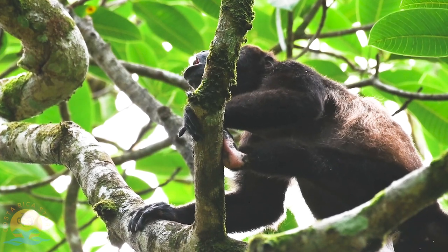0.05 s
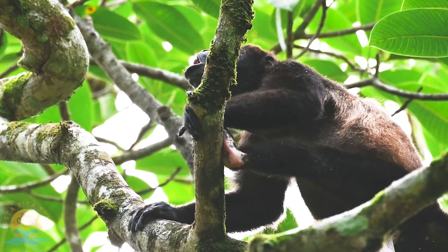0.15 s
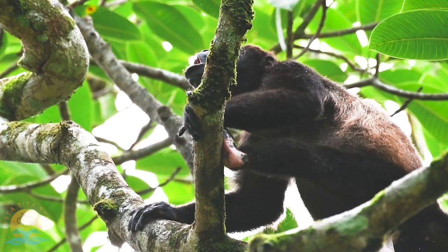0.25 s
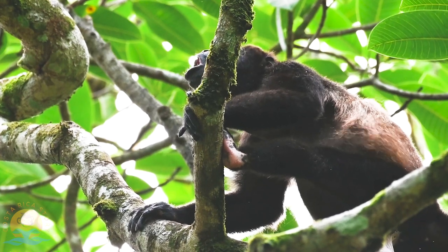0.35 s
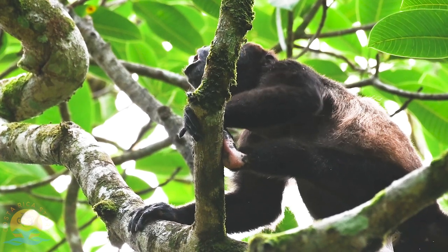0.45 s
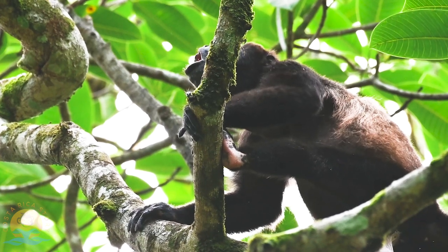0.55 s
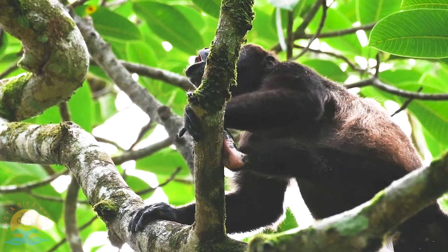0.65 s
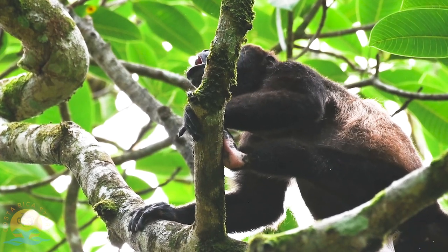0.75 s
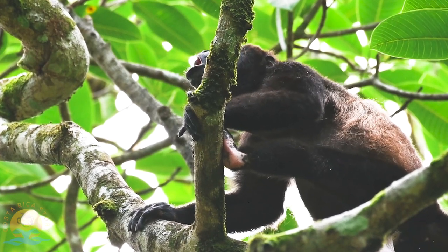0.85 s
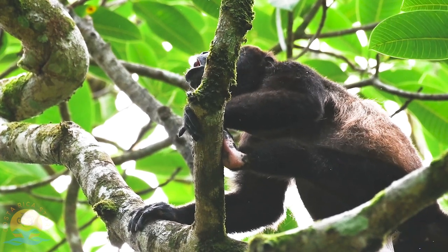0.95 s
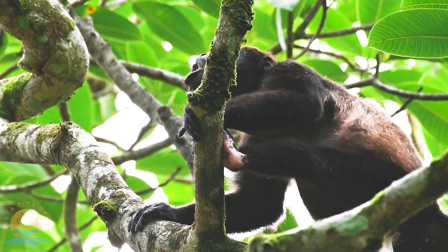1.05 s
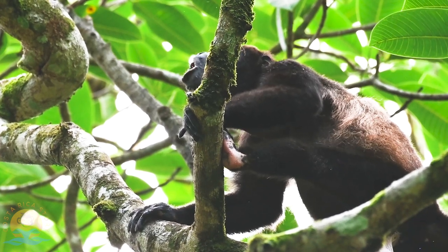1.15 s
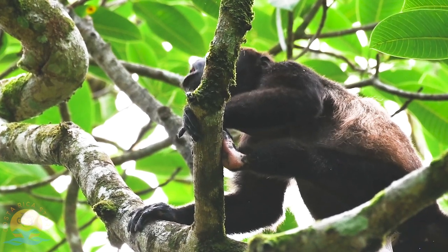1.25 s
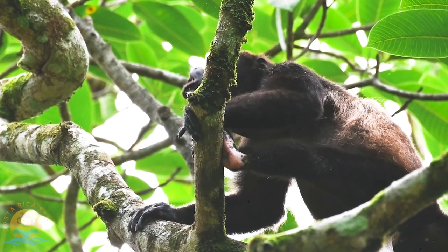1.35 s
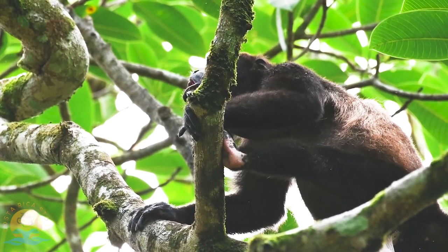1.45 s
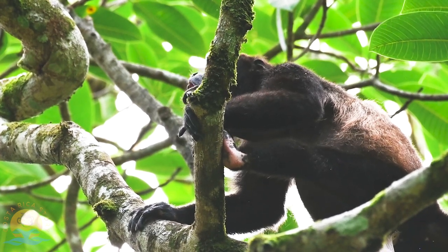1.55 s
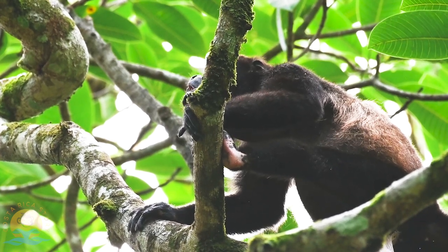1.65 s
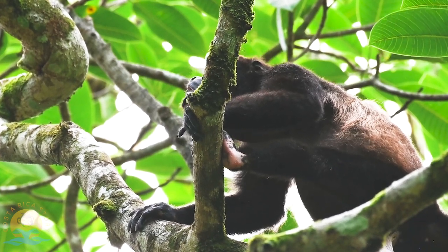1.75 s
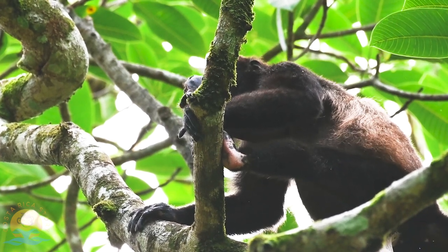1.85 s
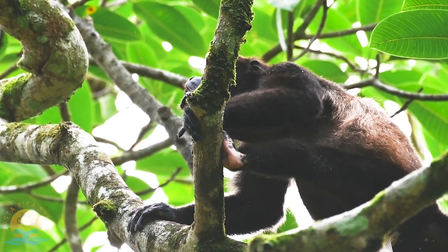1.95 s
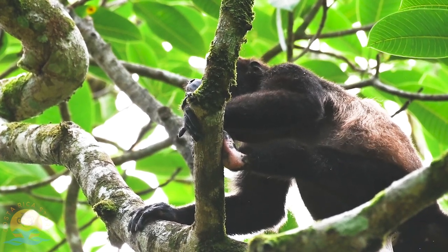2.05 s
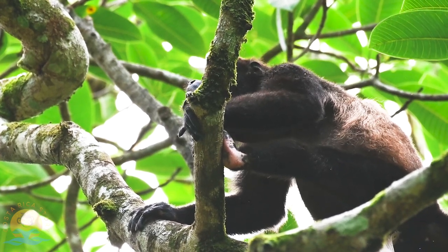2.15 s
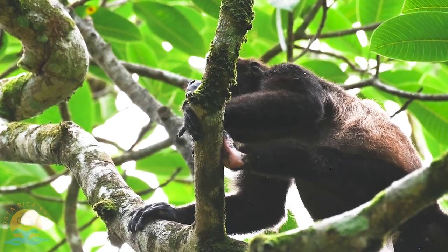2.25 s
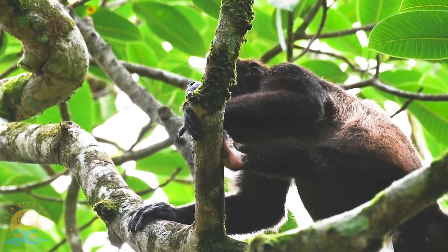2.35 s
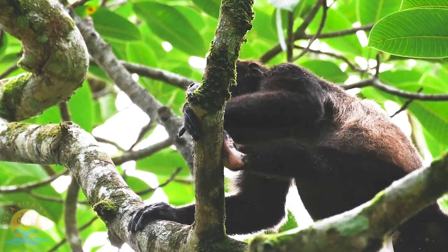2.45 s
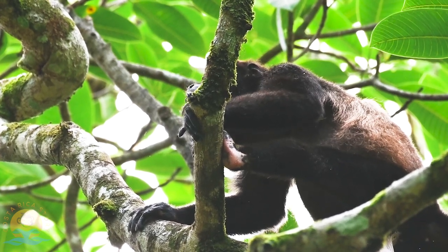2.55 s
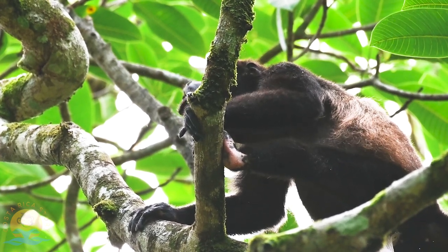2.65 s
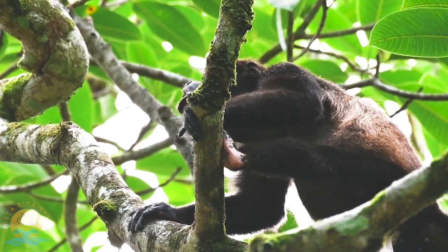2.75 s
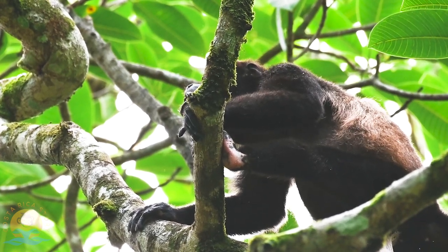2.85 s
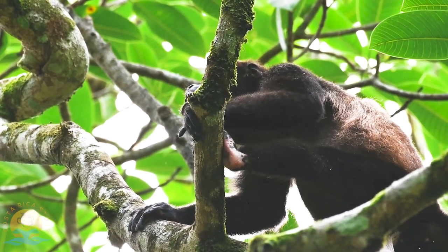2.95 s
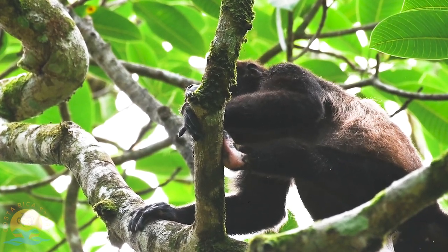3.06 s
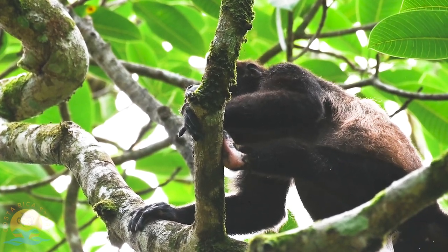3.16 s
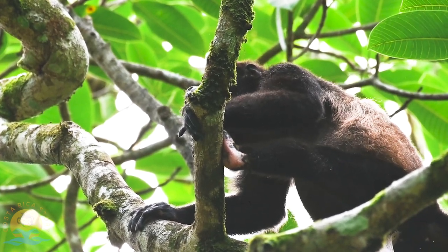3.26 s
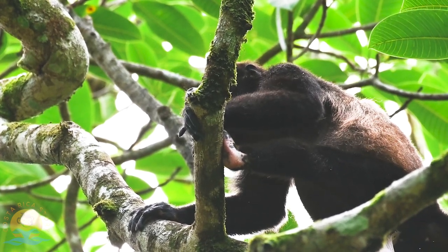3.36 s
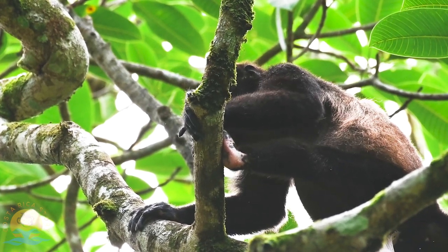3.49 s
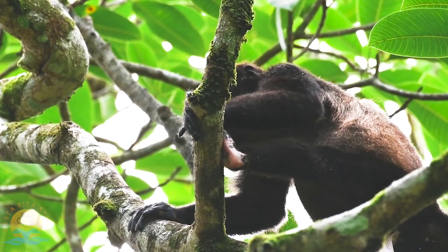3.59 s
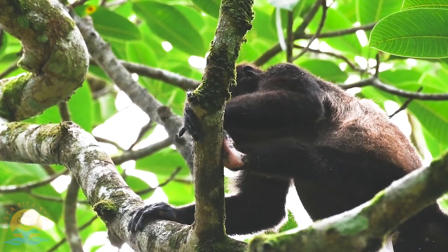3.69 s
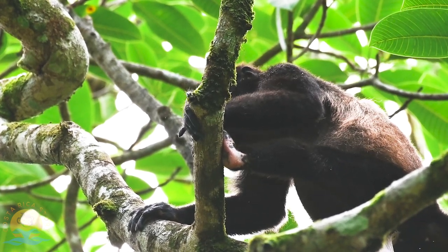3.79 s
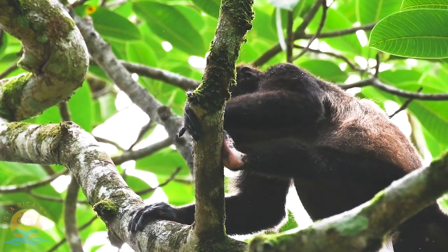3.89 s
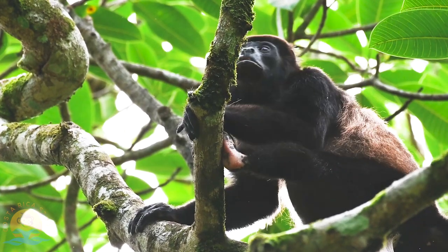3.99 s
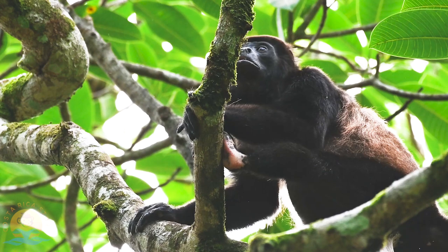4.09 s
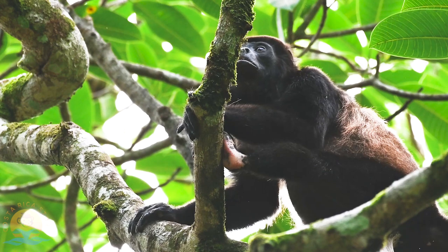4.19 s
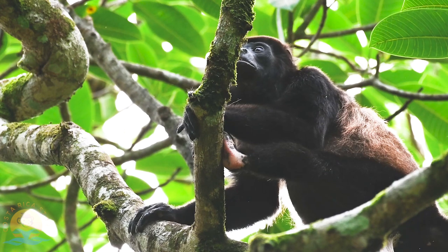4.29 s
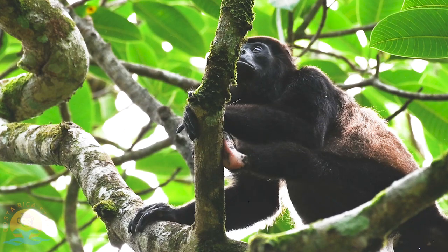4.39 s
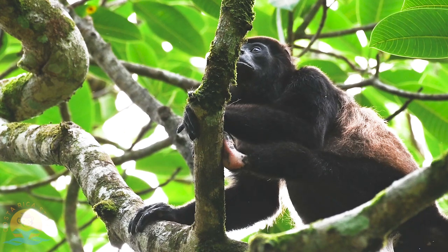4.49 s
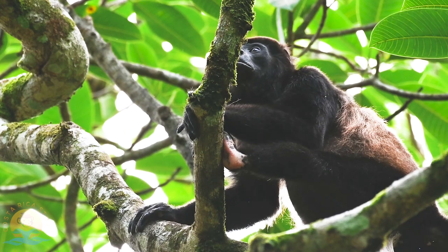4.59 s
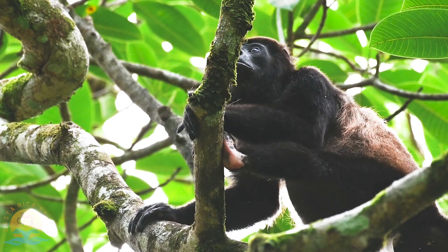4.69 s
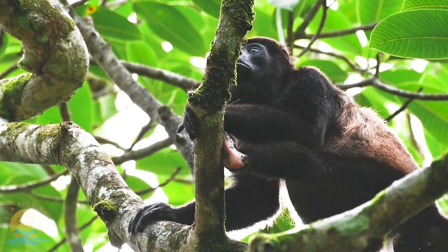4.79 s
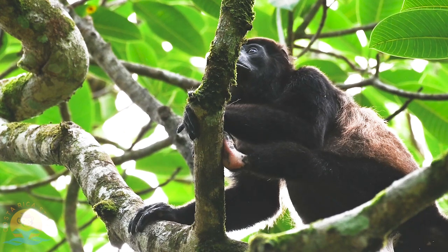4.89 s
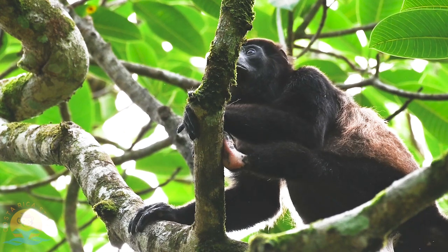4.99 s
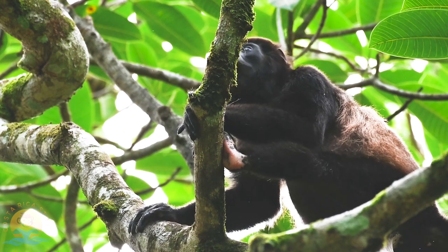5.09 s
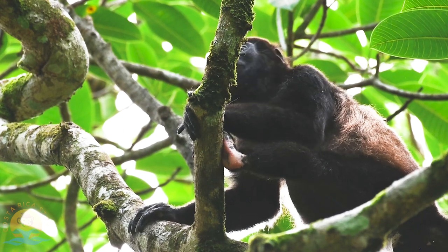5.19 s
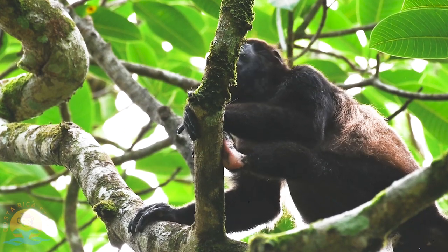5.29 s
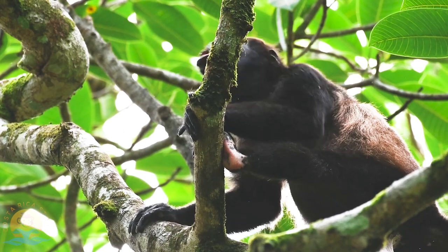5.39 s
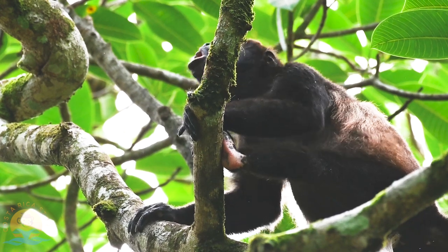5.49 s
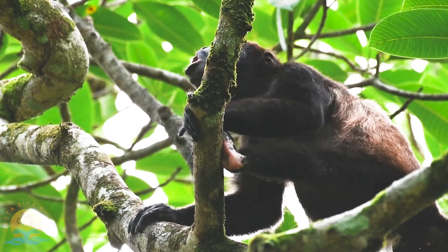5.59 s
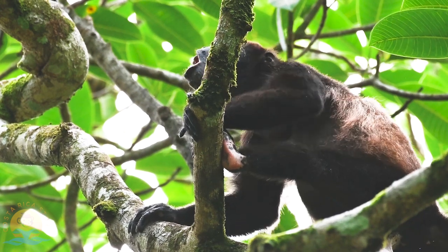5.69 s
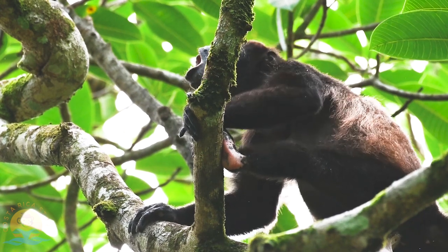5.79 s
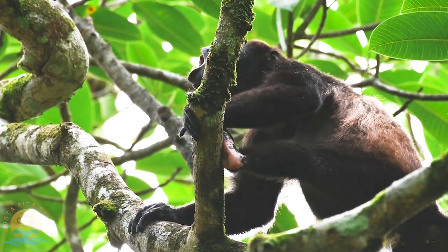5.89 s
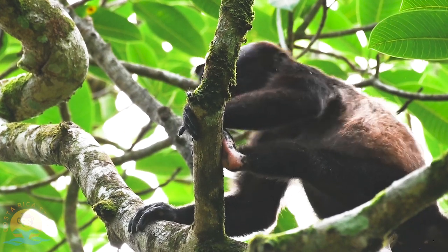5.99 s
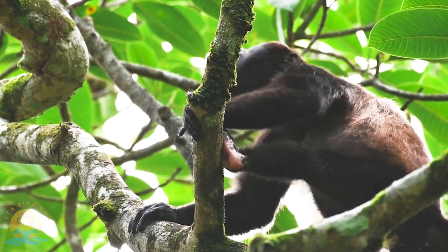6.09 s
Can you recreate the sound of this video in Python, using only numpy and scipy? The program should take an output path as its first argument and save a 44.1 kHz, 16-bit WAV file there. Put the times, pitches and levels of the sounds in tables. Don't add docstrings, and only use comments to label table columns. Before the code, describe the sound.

A howler monkey gives five throaty, echoing barks that weaken, then after a pause grunts into a loud howl, amid constant cicadas in a forest.

```python
import sys
import numpy as np
from scipy import signal
from scipy.fft import rfft, irfft
from scipy.io import wavfile
from scipy.ndimage import uniform_filter1d

SR = 44100
rng = np.random.default_rng(int(sys.argv[2]) if len(sys.argv) > 2 else 0)


def volts(x):
    e = np.asarray(x, float) / 20
    return 10 ** e


def inscribe(sig):
    pcm = np.round(np.clip(np.atleast_2d(sig).T, -1, 1) * 32767)
    wavfile.write(sys.argv[1], SR, pcm.astype(np.int16))


N = 270774
LEAD = SR // 4
TIME = np.arange(-LEAD, N) / SR
WAVER = 0.05


# f/Hz, width/Hz, level/dB
NOSE = [(1330, 33, 13), (1170, 57, 12)]
# f/Hz, width/Hz, level/dB
THROAT = [(2120, 19.6, 7.5), (2020, 25, -7), (5170, 66, -2.5)]


def roars():
    fold_db, fold_hz, rough = effort()
    growl = np.minimum(1.5 * rough ** 1.5, 0.75)
    throat_db, mouth_db, mouth_hz = openings()
    fold = phase_of(fold_hz * (1 + 0.004 * drift(25)))
    third = fold / 3 + 1.6 * rough * drift(25)
    thirds = 1 + growl * (0.55 * np.cos(third) + 0.32 * np.cos(2 * third + 1))
    clean = np.sqrt(1 - rough ** 2)

    halves = 0.6 * np.exp(1j * third) + 0.3 * np.exp(-1j * third)
    halves = 1 + growl * (halves + 0.25 * growl * np.exp(-2j * third))
    low = np.real(halves * np.exp(1j * fold) * (clean + rough * wobble(60)))

    closing = np.diff(np.floor(fold / (2 * np.pi)), prepend=0) * 8 * clean
    turbulence = (0.13 + rough) * (1 + np.cos(fold)) * rng.standard_normal(len(TIME))
    puffs = thirds * (closing + turbulence)

    nose = volts(-24) * rms_one(cavities(puffs, NOSE))
    voice = volts(fold_db) * (evened(low) + nose)
    voice = voice + air_sac(fold, fold_db, rough, thirds, puffs)
    voice = voice + volts(throat_db + 5.5) * evened(cavities(puffs, THROAT))
    voice = voice + volts(mouth_db + 5) * mouth(mouth_hz, thirds, puffs)
    return signal.sosfilt(signal.butter(3, 190, "high", fs=SR, output="sos"), opened() * voice)


# onset t/s, growl peak t/s, growl level/dB, ring start t/s,
# ring level/dB
BARKS = [
    (-.15, -0.081, -23.5, 0.0012, -20),
    (0.459, 0.538, -19, 0.61, -15),
    (1.145, 1.206, -20.5, 1.277, -17.5),
    (1.882, 1.937, -24, 2.04, -27),
    (2.667, 2.73, -33, 2.77, -27),
]
# peak t/s, hold t/s, level/dB, fold f/Hz, roughness (0-1)
PUSHES = [(5.196, .015, -41.5, 330, .7), (5.247, 0.019, -43, 335.6, 0.51), (5.431, 0.063, -43, 402, 0.84),
          (5.506, 0.023, -36.5, 405, .6), (5.635, .02, -34.5, 427.8, 0.62),
          (5.726, 0.0097, -16.5, 401.7, 0.08), (5.769, 0.02, -27.5, 453.5, .5),
          (5.821, 0.0096, -16.5, 442.5, .15), (5.873, 0.0045, -21.5, 459.4, 0.5),
          (5.89, 0.095, -17, 447.1, 0.1), (6.008, 0.006, -21.5, 462, 0), (6.038, 0.014, -24.5, 458, 0.03)]


def effort():
    growl_slopes, ring_slopes, push_slopes = (170, 250), (900, 185), (560, 420)   # (rise, fall) dB/s
    clear_db, rough_per_db = -18, 0.06
    flat_hz_per_db = 2.5
    growls, rings = [], []
    for _, growl_s, growl_db, ring_s, ring_db in BARKS:
        weak_db = clear_db - ring_db
        growls.append((growl_s, 0.04, growl_db, 435.9, 0.52, growl_db))
        ring_hz = 405 - flat_hz_per_db * weak_db
        rings.append((ring_s, 0.03, ring_db, ring_hz, rough_per_db * weak_db, ring_db))
    pushes = [row + row[2:3] for row in map(tuple, PUSHES)]
    s, hold_s, db, hz, rough, top_db = np.transpose(growls + rings + pushes)
    slopes = [growl_slopes] * len(BARKS) + [ring_slopes] * len(BARKS) + [push_slopes] * len(PUSHES)
    db, hz, rough, top_db = swells(s, hold_s, db, slopes, hz, rough, top_db)

    rough = np.clip(rough + 0.3 * rough_per_db * (top_db - db), 0.1, 0.9)
    sag_hz = sum(35.17 * (TIME > s) * np.exp(-np.abs(TIME - s) / 0.025) for *_, s, _ in BARKS)
    uneven_db = 2.5 * rough * np.tanh(drift(31))
    hz = uniform_filter1d(hz + sag_hz, SR // 50) * (1 + WAVER * rough * drift(14))
    return db + uneven_db, hz, rough


def opened():
    howl_s, shut_s, open_s = 5.688, 0.0174, 0.013
    shut = sum((TIME > bark[0] - 8 * shut_s) & (TIME < bark[0]) for bark in BARKS)
    shut = shut + ((TIME > howl_s - shut_s) & (TIME < howl_s))
    return uniform_filter1d(1. - shut, int(open_s * SR), origin=int(open_s * SR / 2) - 1)


# f/Hz, width/Hz, level/dB
SAC = [(770, 68, 5), (873, 27, -5.5), (628, 10, -3), (1050, 100, -14)]
# peak t/s, hold t/s, level/dB, f/Hz
SAC_SWELLS = [(-0.003, 0.0067, -22, 770), (0.506, 0.046, -29, 754), (0.566, 0.045, -25.5, 857),
              (0.697, 0.044, -34, 780), (1.219, 0.056, -28.5, 840), (1.314, 0.036, -23.5, 787.9),
              (1.926, .04, -33.5, 860), (1.999, 0.056, -26, 755), (2.705, 0.026, -38, 871),
              (2.751, 0.029, -30.5, 750), (2.811, 0.028, -36.5, 726), (5.2, 0.07, -50.5, 764),
              (5.452, 0.086, -40.5, 800), (5.55, .01, -36.5, 745), (5.699, 0.024, -30.5, 780),
              (5.766, 0.016, -23.5, 840), (5.818, 0.03, -22.5, 878), (5.869, 0.12, -23, 892),
              (6.041, 0.032, -39, 893)]


def air_sac(fold, fold_db, rough, thirds, puffs):
    s, hold_s, db, hz = np.transpose(SAC_SWELLS)
    sac_db, sac_hz = swells(s, hold_s, db, (300, 170), hz)
    locked = 2 * fold + 0.2 * drift(42)
    free = phase_of(sac_hz * (1 + WAVER * rough * drift(14.23))) + 0.5 * drift(60)
    boom = (1 - rough ** 2) * thirds * np.cos(np.where(TIME > 5.81, locked, free))
    boom = boom + 1.2 * rough * evened(cavities(puffs, SAC))
    return volts(np.maximum(sac_db, fold_db - 11.5)) * evened(boom)


# t/s, hold t/s, throat level/dB, mouth level/dB, mouth resonance f/Hz
OPENINGS = [
    (0.016, 0.0087, -57, -44.5, 3560),
    (.59, 0.034, -47.5, -43, 3580),
    (1.273, 0.026, -57, -45.5, 3630),
    (2.004, .03, -64, -49.5, 3860),
    (2.78, 0.02, -67.5, -63, 3682),
    (5.502, 0.022, -80, -59.5, 3730),
    (5.718, 0.027, -53, -50, 3712),
    (5.783, 0.077, -41, -45.5, 3680),
    (5.888, 0.043, -40, -41.5, 3710),
    (6.09, 0.012, -47.5, -49.5, 3700),
]


def openings():
    s, hold_s, throat_db, mouth_db, mouth_hz = np.transpose(OPENINGS)
    throat_db, = swells(s, hold_s, throat_db, (470, 210))
    mouth_db, mouth_hz = swells(s, hold_s, mouth_db, (90, 74), mouth_hz)
    return throat_db, mouth_db, mouth_hz


# f/Hz, width/Hz, level/dB
MOUTH = [(3240, 65, -0.5), (3560, 58, -7), (3795, 120, -4.5), (5180, 30, -4.5), (5520, 43, -6.5),
         (6110, 150, -6.5)]


def mouth(mouth_hz, thirds, puffs):
    moving = thirds * np.real(np.exp(1j * phase_of(mouth_hz)) * wobble(95))
    lift = np.clip((mouth_hz - 3500) / 150, 0.6, 3)
    return evened(rms_one(cavities(puffs, MOUTH)) + lift * moving)


# t/s, f/Hz, level/dB
LOW_NOTE = [
    (6.05, 335.2, -63),
    (6.065, 338.5, -38),
    (6.098, 337.7, -23.5),
    (6.122, 334, -18.5),
    (6.14, 321, -24.5),
]
# multiple of the pitch, level/dB
LOW_NOTE_ORDERS = [(1, -6), (2, -12.5), (3, -15.5), (4, -49), (5, -34.5), (6, -12.5), (7, -35.5), (8, -44),
                   (9, -23.5), (10, -18), (11, -14), (12, -22), (13, -21.5), (14, -48), (15, -24),
                   (16, -43), (17, -41), (18, -21.5), (19, -29)]


def low_note():
    return tone(LOW_NOTE, LOW_NOTE_ORDERS, rough=0.05, wobble_hz=40)


# t/s, f/Hz, level/dB
AFTER_HOWL = [
    (6.06, 888, -19),
    (6.082, 907, -32),
    (6.118, 880, -25),
    (6.14, 870, -28.5),
]


def after_howl():
    return tone(AFTER_HOWL, ((1, -10), (1.5, -17)), rough=0.21)


# t/s, f/Hz, level/dB
WHOOP = [
    (3.285, 925, -73),
    (3.301, 920, -44),
    (3.321, 577, -52),
    (3.345, 537, -57),
    (3.37, 695, -53),
    (3.392, 767, -43.5),
    (3.44, 825, -51),
    (3.53, 844, -45.5),
    (3.58, 875, -45),
]


def bird():
    return tone(WHOOP, rough=0.05)


# t/s, hold t/s, level/dB, f/Hz, left-right level/dB
TRILLS = [
    (2.996, 0.11, -61, 3400, 3),
    (4.22, 0.22, -55.5, 3370, -10),
]


def trill(s, hold_s, db, hz, pan_db):
    rows = [(s - 0.06, hz, db - 18), (s, hz, db),
            (s + hold_s, hz, db - 8.5), (s + hold_s + 0.052, hz, db - 16)]
    return tone(rows, rough=0.66, wobble_hz=60) * volts([[pan_db / 2], [-pan_db / 2]])


def forest(x):
    t60_s, cut_hz = 1.33, 6700
    t = np.arange(int(1.2 * SR)) / SR
    tail = rng.standard_normal((2, len(t))) * volts(-60 * t / t60_s) * np.minimum(t / 0.0051, 1)
    tail = tail * volts(0.7 * drift(24.0)[-len(t):])
    tail = signal.sosfilt(signal.butter(1, cut_hz, fs=SR, output="sos"), tail)
    tail = tail / np.sqrt(np.sum(tail ** 2) / 2)
    mid, side = signal.fftconvolve(x[None], tail, axes=1)[:, :len(x)]
    flutter_db = drift(12)
    return volts(-15.5 + flutter_db) * diffuse(mid, volts(2.5) * side)


# t/s, level/dB, left-right level/dB
CICADAS = [(0, -38, 1.5), (2.74, -38, 1.5), (3.09, -39, 1.5), (3.5, -38, 2), (3.95, -38, 1),
           (4.1, -40.5, -1.5), (4.39, -39, -0.5), (4.6, -40, -3), (5.28, -39.5, -.5), (5.76, -39.5, -3),
           (5.97, -43.5, -2.5), (6.14, -39.5, 0)]
# f/Hz, spectral level/dB per Hz
CICADA = [(3410, -33.5), (5800, -44), (6150, -20), (6970, -4.5), (8530, 1), (8840, -0.5), (12500, -28),
          (16200, -28), (22000, -120)]
# f/Hz, level/dB
LATE_SINGER = [(6000, -4.5), (8500, 4), (11500, 10), (14000, 6)]
SINGER_RATES_HZ = (79.0, 94.5, 84.8)
SINGER_DB = (2, -2.5, 3)


def cicadas():
    db, pan_db = in_time(CICADAS)
    handover = np.clip((TIME - 3.9) / 0.2, 0, 1)
    steady, early, late = [volts(level_db) * singer(hz) for hz, level_db in zip(SINGER_RATES_HZ, SINGER_DB)]
    throb = 1 + np.array([[0.08], [0.25]]) * np.sin(phase_of(31.5 + 0.21 * drift(0.68)))
    far = throb * rng.standard_normal((2, len(TIME)))
    near = (1 - handover) * (early + steady) + handover * coloured(late, LATE_SINGER)
    chorus = np.array([evened(c) for c in coloured(far + near, CICADA)])
    return volts(db + 3.5 + pan_db * [[0.5], [-0.5]]) * chorus


def singer(rate_hz, smear_s=0.026):
    cycles = phase_of(rate_hz * (1 + 0.0015 * drift(2))) / (2 * np.pi)
    clicks = np.diff(np.floor(cycles), prepend=0) * volts(1.7 * drift(27))
    t = np.arange(SR // 20) / SR
    paths = rng.standard_normal((4, len(t))) * np.exp(-t / smear_s)
    heard = signal.fftconvolve(clicks[None], paths, axes=1)[:, :len(TIME)]
    sway = 0.8 * drift(1.2)
    return rms_one(np.cos(sway) * heard[:2] + np.sin(sway) * heard[2:])


# t/s, hold t/s, level/dB
RASPS = [(0, 0.04, -50), (0.489, 0.38, -52.5), (1.073, 0.31, -53), (1.612, 0.053, -52.5),
         (1.731, 0.035, -49.5), (1.98, .05, -51.5), (2.2, .15, -51), (2.9, 0.029, -48),
         (3.192, 0.12, -51.5), (3.512, 0.14, -53.5), (3.788, 0.14, -50), (4.05, .22, -51.5),
         (4.464, 0.37, -53.5), (5.212, 0.17, -51), (5.516, 0.08, -52.5), (5.7, 0.37, -49.5)]


def cricket():
    db = swells(*np.transpose(RASPS), (200, 48))[0]
    db = np.maximum(db + drift(8.7), -59)
    teeth = 1 + 0.1 * np.cos(phase_of(120 * (1 + 0.15 * drift(8.6))))
    body = np.exp(1j * phase_of(4950 + 26 * (db + 51)))
    upper = volts(1.5 * (db + 45)) * np.exp(2j * np.pi * 650 * TIME) * wobble(150)
    body = body * (1 + upper)
    shared, left, right = [teeth * np.real(body * wobble(510)) for _ in range(3)]
    ports = np.array([shared + 3.8 * left, shared + 3.3 * right])
    band = signal.butter(3, [4500, 5950], "band", fs=SR, output="sos")
    return volts(db + 4.0) * rms_one(signal.sosfilt(band, ports))


# t/s, peak level/dB
TICK = [
    (1.762, -30),
]


def twig():
    (s, db), = TICK
    snap = rng.standard_normal(len(TIME)) * (TIME > s) * np.exp(-np.abs(TIME - s) / 0.0018)
    return volts(db) * signal.sosfilt(signal.butter(2, 11500, "high", fs=SR, output="sos"), snap)


# f/Hz, spectral level/dB per Hz
AIR = [(12, -43), (20, -18.5), (80, 3.5), (126, -5.5), (404, -1), (549, -4), (1420, -4.5), (3860, -11.5),
       (4310, -14.5), (4960, -23), (5860, -18), (7120, -13), (8650, -5.5), (12100, -27), (15500, -25)]
# t/s, level/dB
GUST = [
    (0, 0.5),
    (4.0, 3.5),
    (4.3, 3.5),
    (5.8, 4.5),
    (6.05, 0),
]


def air():
    gust_db, = in_time(GUST)
    still = rms_one(diffuse(*coloured(rng.standard_normal((2, len(TIME))), AIR)))
    rumble = signal.sosfilt(signal.butter(2, 200, fs=SR, output="sos"), still)
    leaves = signal.sosfilt(signal.butter(3, 11500, "high", fs=SR, output="sos"), still)
    swell = rumble * (volts(gust_db + drift(1.1)) - 1) + leaves * (volts(drift(3)) - 1)
    return volts(-42) * (still + swell)


# f/Hz, side minus mid level/dB
PORTS = [(60, -22), (180, -14.5), (550, -13.5), (1650, -3), (4970, 3), (15000, 2)]


def diffuse(mid, side):
    side = coloured(side, PORTS)
    return np.array([mid + side, mid - side])


def tone(rows, orders=((1, 0),), rough=0.1, wobble_hz=30):
    hz, db = in_time(rows)
    turn = phase_of(hz) + rough * drift(wobble_hz)
    partials = sum(volts(order_db) * np.sin(k * turn + k * k) for k, order_db in orders)
    return gate(rows) * volts(db + 6.5) * partials


def cavities(x, modes):
    return sum(volts(db) * resonance(resonance(x, hz, 3 * w), hz, w) / np.sqrt(w) for hz, w, db in modes)


def resonance(x, hz, width_hz):
    r = np.exp(-np.pi * width_hz / SR)
    poles = [1, -2 * r * np.cos(2 * np.pi * hz / SR), r * r]
    return signal.lfilter([(1 - r * r) / 2, 0, (r * r - 1) / 2], poles, x)


def swells(s, hold_s, db, slopes, *settings):
    t = TIME[::32, None]
    rise, fall = np.transpose(slopes)
    levels = db - rise * np.maximum(s - t, 0) - fall * np.maximum(t - s - np.abs(hold_s), 0)
    loudest = levels.argmax(axis=1)
    chosen = [np.array(v)[loudest] for v in settings]
    return in_time(np.column_stack([t[:, 0], levels.max(axis=1)] + chosen))


def in_time(rows):
    s, *columns = np.transpose(rows)
    return [uniform_filter1d(np.interp(TIME, s, c), SR // 140) for c in columns]


def gate(rows, release_s=0.0058):
    on = 1. * ((TIME >= (rows[0][0] or -1)) & (TIME <= rows[-1][0]))
    r = np.exp(-1 / (release_s * SR))
    return uniform_filter1d(np.maximum(on, signal.lfilter([1 - r], [1, -r], on)), SR // 120)


def coloured(x, points):
    hz = np.fft.rfftfreq(x.shape[-1], 1 / SR) + 1
    point_hz, point_db = np.array(points).T
    gain = volts(np.interp(np.log(hz), np.log(point_hz), point_db))
    return irfft(rfft(x) * gain, x.shape[-1])


def drift(hz, channels=1):
    r = np.exp(-2 * np.pi * hz / SR)
    noise = rng.standard_normal((channels, len(TIME)))
    return rms_one(signal.lfilter([1], [1, -2 * r, r * r], noise)).squeeze()


def wobble(hz):
    real, imag = drift(hz, channels=2)
    return (real + 1j * imag) / np.sqrt(2)


def phase_of(hz):
    return 2 * np.pi * np.cumsum(hz) / SR


def rms_one(x):
    return x / np.sqrt(np.mean(np.abs(x) ** 2) + 1e-20)


def evened(x):
    return x / np.sqrt(uniform_filter1d(x * x, SR // 25) + 1e-12)


def scene():
    monkey = roars() + low_note() + after_howl()
    whoop = bird()
    near = monkey * volts([[0.2], [-0.2]]) + whoop + sum(trill(*row) for row in TRILLS)
    echoes = forest(monkey + volts(4) * whoop)
    return (near + echoes + cicadas() + cricket() + air() + twig())[:, LEAD:]


def band_limit(x):
    return signal.sosfilt(signal.butter(12, 15670, fs=SR, output="sos"), x)


def record(dry):
    ports = np.array([dry[0], np.roll(dry[1], 2)])
    mix = 0.75 * np.tanh(ports / 0.85)
    return band_limit(mix)


dry = scene()
out = record(dry)
inscribe(out)
```